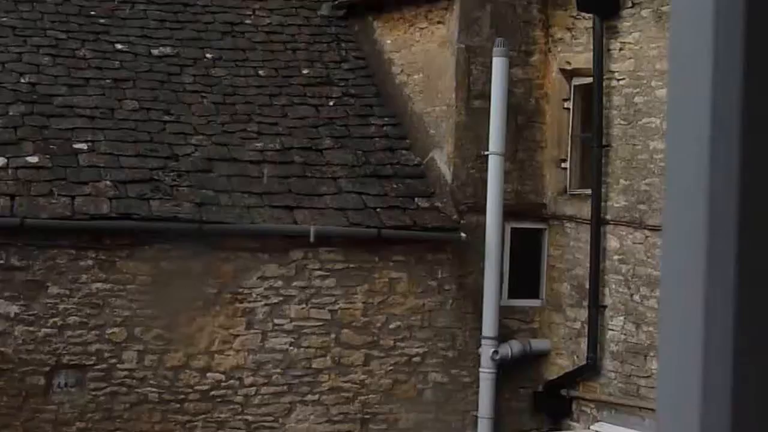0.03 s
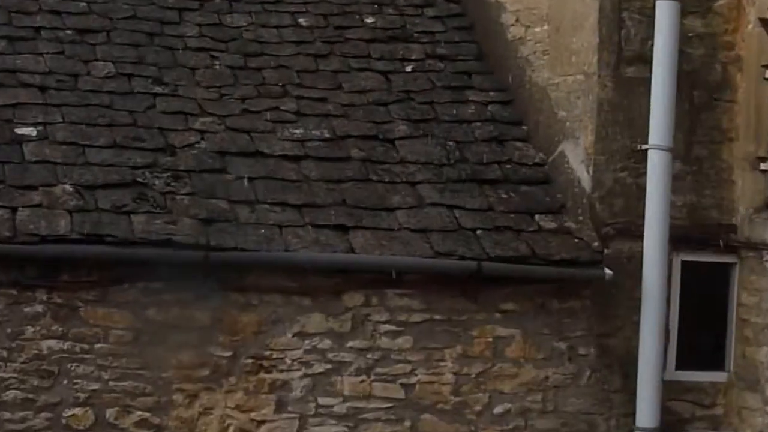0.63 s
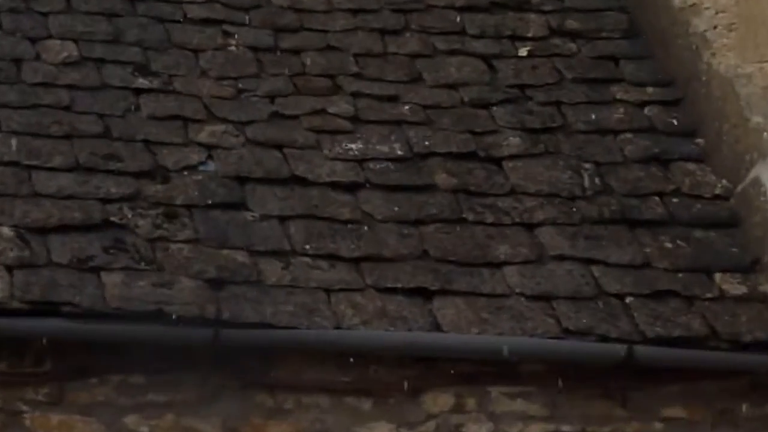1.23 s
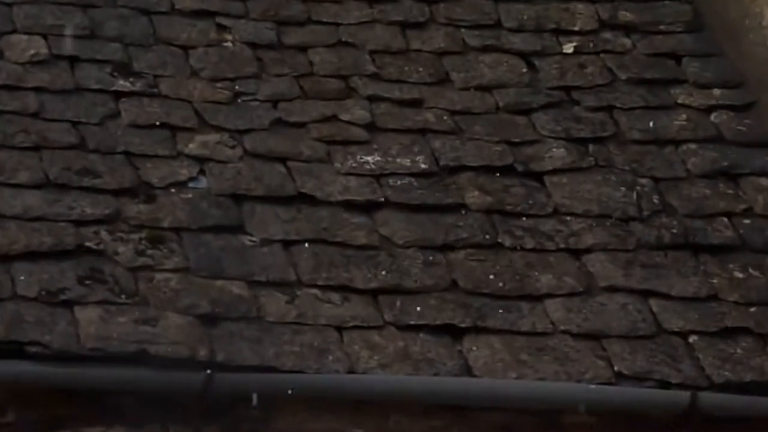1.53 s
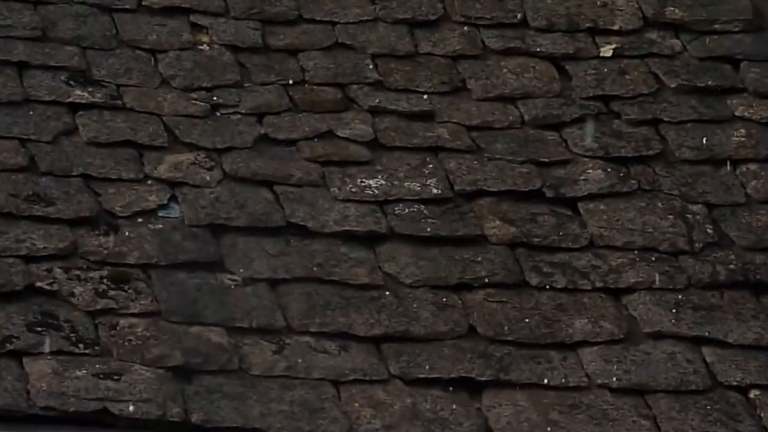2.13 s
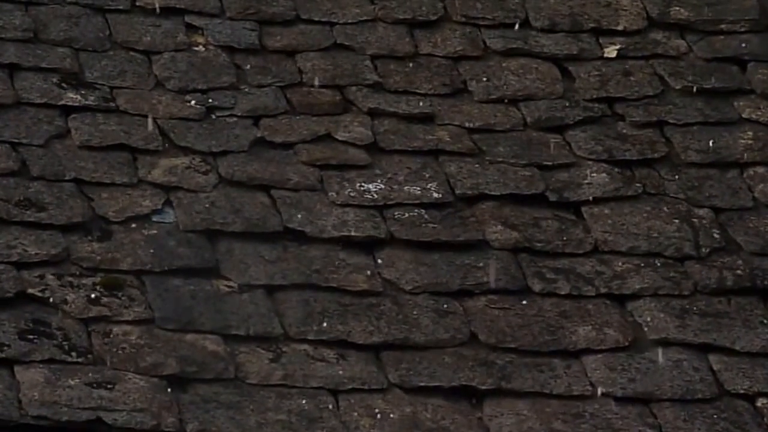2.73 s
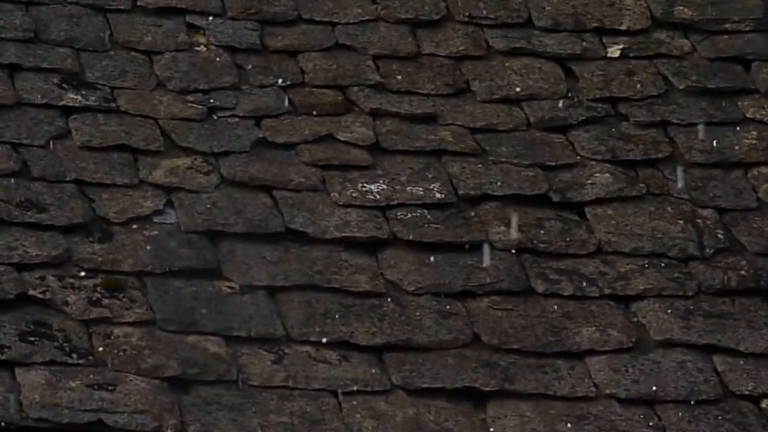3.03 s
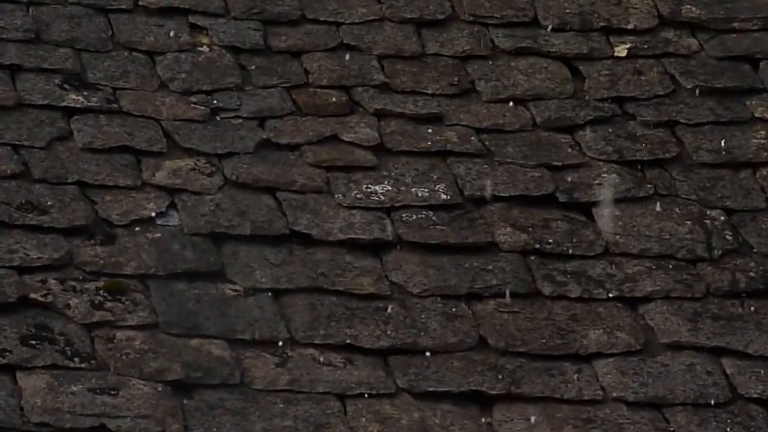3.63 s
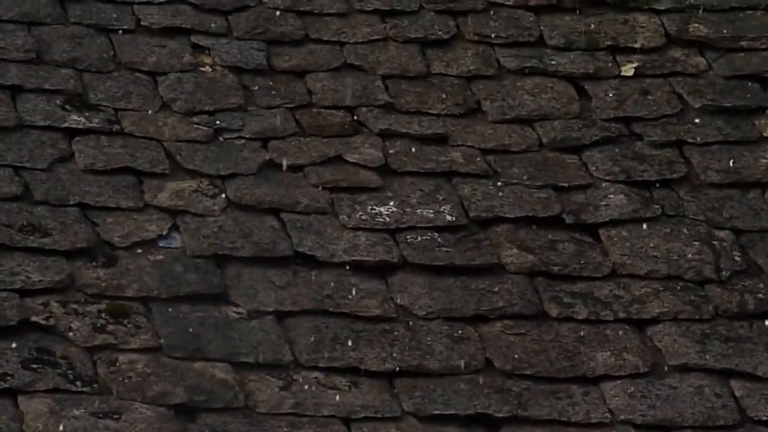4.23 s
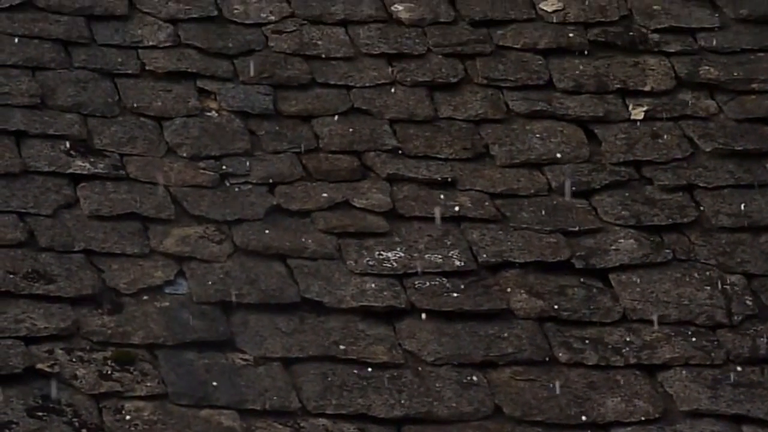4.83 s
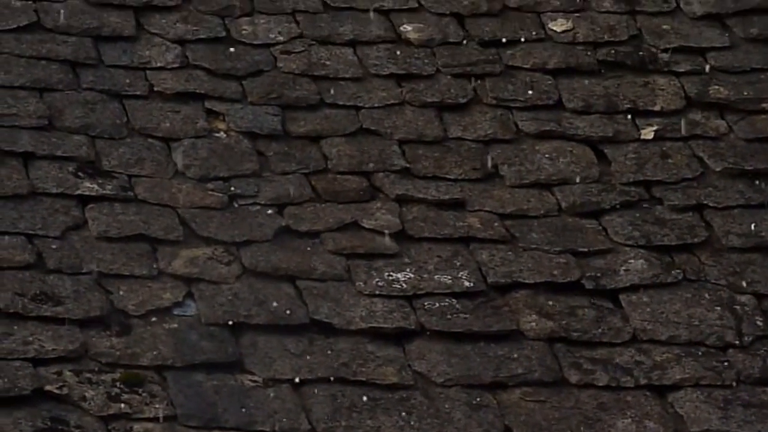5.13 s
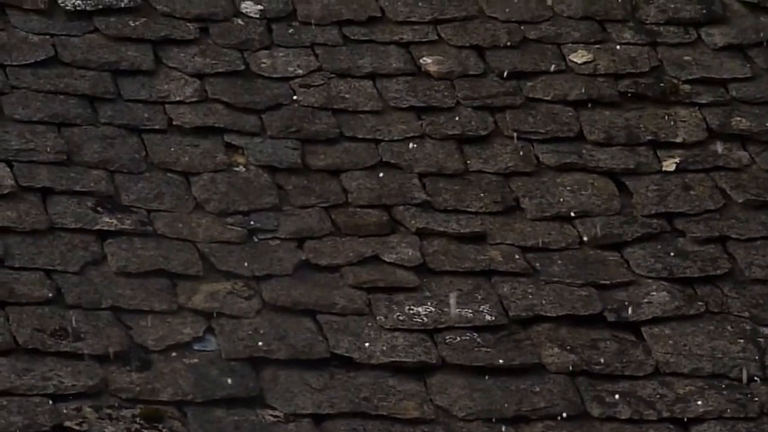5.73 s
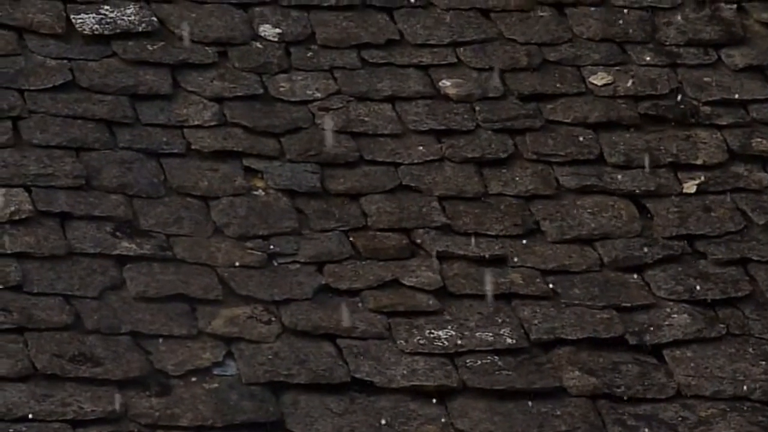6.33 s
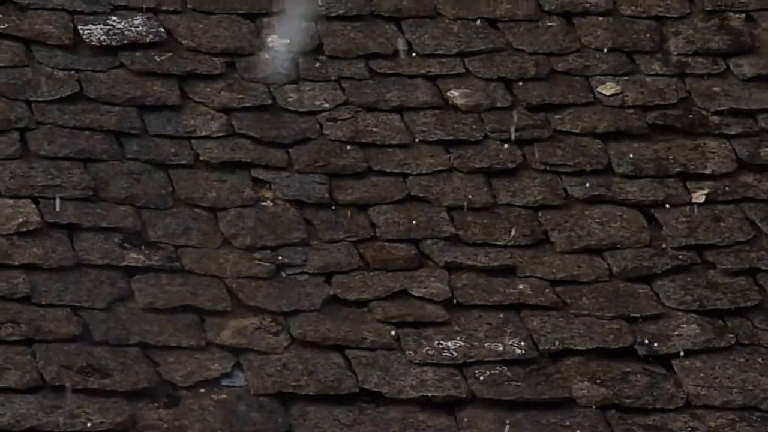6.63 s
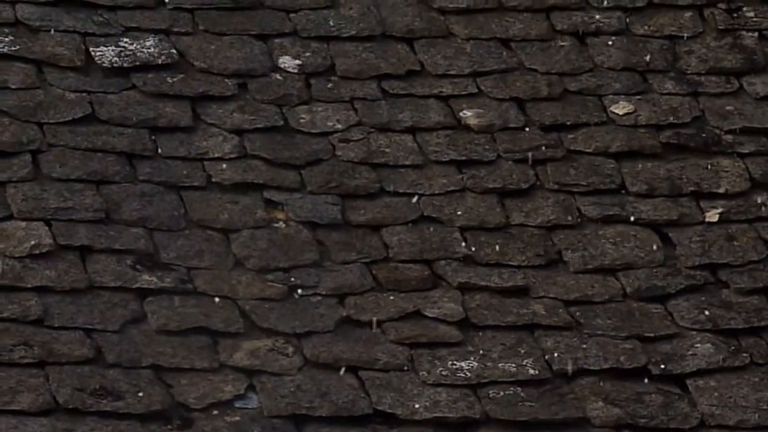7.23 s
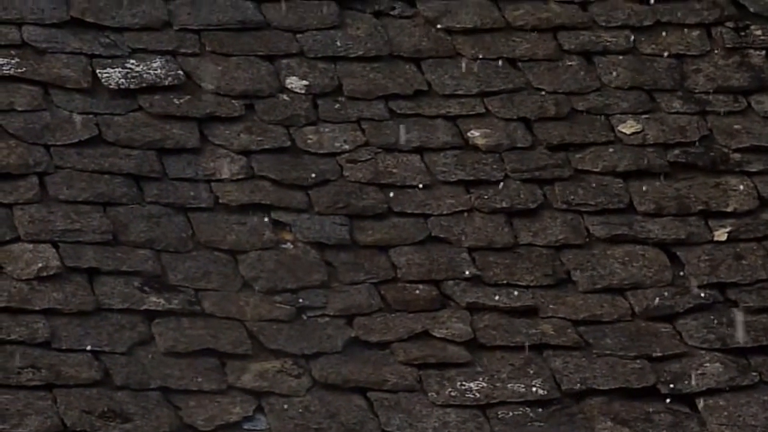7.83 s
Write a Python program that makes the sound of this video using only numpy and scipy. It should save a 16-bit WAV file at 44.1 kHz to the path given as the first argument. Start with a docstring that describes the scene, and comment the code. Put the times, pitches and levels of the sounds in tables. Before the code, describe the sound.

Hail falls on stone-tiled roofs and hard ground in a walled yard. It starts as a lighter patter with scattered sharp clicks, then grows heavier after about two seconds and stays dense. Close pellets hit with icy ticks, stony clacks and dull knocks, some bouncing once. Farther impacts merge into a grainy wash over a faint low rumble of outdoor air.

```python
"""Hail falls on stone-tiled roofs and hard ground in a walled yard, growing heavier after two seconds.
Each pellet gives a dull knock, a stony clack and an icy tick; near ones click sharply and some bounce,
far ones merge into a wash over a low rumble of outdoor air. The walls return a short tail.
The camera's microphone pair has four deep notches and a narrow band that rings thinly at its edge."""
import sys
import numpy as np
from scipy import signal
from scipy.fft import rfft, irfft
from scipy.io import wavfile

SR = 44100
rng = np.random.default_rng(int(sys.argv[2]) if len(sys.argv) > 2 else 0)


def bounce(signal):
    """Save signal as a 16-bit WAV file at the path given by the first command-line argument."""
    frames = np.transpose(np.atleast_2d(signal))
    limited = np.clip(frames, -1, 1)
    pcm = np.round(limited * 32767).astype(np.int16)
    wavfile.write(sys.argv[1], SR, pcm)


N = 351477
TAPS = 4096  # samples in one impact or filter response
HZ = np.fft.rfftfreq(TAPS, 1 / SR)

# The loudest, nearest hits, levels before trim:
# t/s, knock/dB, tile pitch/Hz, clack/dB, tick/dB, base half-life/ms, left minus right/dB
PELLETS = [(0.1152, -34.5, 900, -32, -36.0, 3, -3), (0.2407, -47, 800, -59, -34.5, 1.9, -2),
           (0.3327, -53, 790, -43, -32.5, 2.0, -1), (0.3809, -41.5, 455, -38, -39, 2.7, -1),
           (0.4577, -45, 1320, -56, -36.5, 1.3, -4), (0.8277, -38, 1090, -53, -39, 4.6, 1),
           (0.8399, -36, 720, -34.5, -45, 2.4, -4), (0.941, -37.5, 520, -60, -65, 5.3, 2),
           (1.0117, -52, 720, -44.5, -43, 3.9, 1), (1.2013, -35, 400, -45, -54, 7.3, 0),
           (1.5681, -46, 440, -46, -35.5, 1.4, -1), (1.5881, -47, 540, -35, -48, 3.2, 2),
           (1.6111, -41, 1130, -44, -46.0, 4.0, -2), (1.6774, -51, 820, -50, -30, 1.6, -2),
           (1.7492, -46, 540, -48, -31, 3.6, -2), (1.8144, -41, 1100, -40.5, -38.5, 5.1, -1),
           (1.8543, -35, 1280, -47, -39, 2.1, -3), (1.9129, -52, 870, -48, -32, 1.9, -3),
           (1.9304, -37.5, 910, -38, -28, 3.3, -2), (1.9562, -35.5, 1070, -45, -40.5, 3.9, -3),
           (2.052, -58, 1070, -40, -35, 2.9, -4), (2.1913, -30, 1290, -48, -53, 1.1, -3),
           (2.3656, -36.0, 1190, -45, -37.5, 5.8, -3), (2.4761, -34.0, 940, -45, -40, 2.5, -1),
           (2.6213, -31, 560, -27.5, -37.5, 3, 2), (2.7259, -50, 1160, -38, -32.5, 2.0, 0),
           (2.7832, -38, 490, -40, -43, 4.4, -3), (2.8204, -34, 740, -48, -35, 1.3, -1),
           (2.9355, -22.5, 1130, -28, -34.5, 2.1, -1), (3.0017, -35, 1140, -39, -30.5, 3.4, -2),
           (3.0216, -30.0, 870, -28, -43, 1.1, 0), (3.1724, -42, 500, -30.5, -34, 2.3, 8),
           (3.2172, -35, 1420, -37, -36, 2.9, -5), (3.2406, -30.5, 930, -38, -38, 2.5, -1),
           (3.3506, -30.5, 980, -31.5, -31.5, 2.4, -1), (3.4001, -26.5, 570, -30, -25, 3.7, -2),
           (3.4247, -29, 1100, -44, -41, 13, -5), (3.4926, -29, 1110, -25.5, -20.0, 2, -4.5),
           (3.5749, -52, 750, -50.5, -28.5, 1.5, -2), (3.6362, -25.5, 1140, -34.5, -30, 7.6, -4),
           (3.6572, -26, 1110, -35, -37, 1.7, -3), (3.6662, -33.5, 544, -43.5, -29, 1.4, -2),
           (3.6856, -29, 1000, -32.5, -49, 7.7, 3), (3.7066, -42, 930, -43, -28, 2.3, -3),
           (3.7892, -31.5, 1180, -35, -26, 1.8, -5), (3.8061, -29.5, 1113, -40.5, -51.5, 3.8, 2),
           (3.829, -36, 560, -45, -35, 1.3, 0), (3.9022, -31.5, 760, -47, -31.5, 12, -3),
           (3.9944, -30.5, 1080, -24, -37, 2.1, 2), (4.0179, -34, 1250, -34, -35, 3.4, 0),
           (4.0734, -25.5, 1080, -27.5, -29, 2.4, -1), (4.1032, -42, 1080, -32.5, -38, 1.5, -3),
           (4.1458, -24.5, 1020, -24.5, -24, 2.7, 1), (4.2447, -33.5, 1150, -39.5, -34.5, 2.6, -3),
           (4.2763, -28.5, 770, -38, -40, 7.0, -2), (4.3481, -31, 1060, -24.5, -22.5, 2.2, -1),
           (4.4136, -27, 524, -34.0, -35, 3.4, -3), (4.4383, -29.5, 1130, -36, -36, 6.1, -2),
           (4.4506, -30.5, 860, -42, -30, 1.7, -1), (4.4791, -31.5, 1110, -26.5, -27, 2.9, -1),
           (4.4945, -35, 1090, -30.0, -23.5, 1.6, 0), (4.6326, -26.5, 1090, -39, -35.5, 2.5, -1),
           (4.7979, -29, 1130, -27.5, -17.5, 1.4, -6.5), (4.8433, -37, 660, -41, -37, 2, 2),
           (4.8932, -28.5, 1100, -33.0, -31, 3.5, 2), (4.9857, -32.5, 895, -45, -43, 9.4, -4),
           (5.04, -30.5, 1340, -52, -54, 5, -4), (5.06, -32.5, 1120, -42, -32.5, 3, 2),
           (5.1588, -29, 1440, -29, -26, 4.3, -4), (5.2084, -31.5, 880, -32.5, -25, 1.6, 0),
           (5.2321, -40.5, 570, -40, -32.5, 2.7, -3), (5.286, -31.5, 1110, -30, -37, 1.5, -1),
           (5.2963, -31, 1120, -29, -32, 3.6, 3), (5.3178, -33, 1100, -41.0, -35.5, 2, -2),
           (5.3393, -30.5, 1230, -36.5, -39, 5.3, -1), (5.5207, -30.5, 1100, -35.0, -48, 4.1, -2),
           (5.5435, -40, 480, -37, -46, 7.9, 2), (5.6162, -27, 1080, -33.5, -41, 3.2, 0),
           (5.6549, -26.5, 900, -34, -44.5, 3.8, -4), (5.7141, -32, 733, -42.0, -41.5, 9.5, -5),
           (5.7679, -41, 1130, -36.5, -36, 1.8, 0), (5.8322, -39.5, 595, -34, -38, 3.8, 1),
           (6.0272, -43, 1120, -42, -26.5, 1.8, -1), (6.0388, -31, 1090, -30.0, -35, 3.5, 1),
           (6.0562, -43, 1200, -36, -22.5, 2.1, -3), (6.112, -25.5, 1140, -42, -50, 3.5, 4),
           (6.1616, -29.5, 1220, -29.5, -30.5, 3.5, -1), (6.2128, -30.5, 1080, -35, -33.5, 5.2, 2),
           (6.2286, -31, 1240, -30.5, -35, 3.3, 0), (6.5217, -33, 1230, -36.5, -35.5, 8.9, 1),
           (6.5907, -46, 990, -46, -30.5, 1.7, -7), (6.6244, -32, 1050, -31.5, -33, 13, 0),
           (6.6492, -44, 1040, -40, -30, 1.3, -2), (6.7117, -27, 1090, -32.0, -29, 5.6, -4),
           (6.7654, -32, 900, -34, -27.5, 3, -3), (6.7794, -26.5, 860, -32.5, -29, 1.2, -2),
           (6.811, -26.5, 870, -42, -31.0, 1.6, -4), (6.9001, -27, 1090, -50, -45, 6.5, -1),
           (6.917, -31.5, 710, -31.5, -27.5, 2.7, -4), (7.031, -29, 1360, -37, -33, 7.2, -6),
           (7.1885, -27.5, 945, -22.5, -17.5, 1.6, -2), (7.3483, -36, 920, -28, -27.0, 3.3, 1),
           (7.3747, -25, 1110, -28.5, -26.5, 2.9, -2), (7.4547, -25, 1200, -25.5, -26.5, 2.9, 1),
           (7.492, -41, 680, -38, -30, 2.1, -2), (7.5467, -30.5, 1190, -44, -42, 3.5, -1),
           (7.6004, -33, 970, -27.0, -50, 1.7, -1), (7.6227, -24.5, 1090, -30.5, -26.5, 5.7, -3),
           (7.6446, -38, 1110, -44.5, -32.5, 2.4, -3), (7.8612, -26.5, 930, -24.5, -33, 2.5, 4),
           (7.9548, -42, 1110, -29.5, -30.5, 1.3, -2)]


def gain_of(db):
    """Decibels to amplitude."""
    return 10 ** (np.asarray(db) / 20)


def unit_rms(x):
    """Scales to rms 1."""
    return x / np.sqrt(np.mean(x ** 2) + 1e-20)


def curve_at(points, hz):
    """Reads a table on a log-frequency axis."""
    f, value = np.transpose(points)
    return np.interp(np.log(hz + 1), np.log(f + 1), value)


def colour(points):
    """The minimum-phase response of an EQ curve."""
    log_gain = np.log(gain_of(curve_at(points, HZ)))
    mirrored = np.r_[log_gain, log_gain[-2:0:-1]]
    return np.exp(np.conj(signal.hilbert(mirrored)))[:len(HZ)]


def mic_pair(spectra, hz):
    """Turns two unrelated spectra into left and right, alike in the bass and wider above."""
    # Stereo width of the two microphones: f/Hz, side minus mid/dB
    width_curve = [(30, -31.5), (90, -47), (250, -43), (500, -28.5), (1100, -19.5), (1700, -8),
                   (2500, -4.5), (3400, -4.5), (4200, -4), (5600, -6.5), (8000, -4)]
    width = gain_of(curve_at(width_curve, hz))
    mid, side = spectra[0], width * spectra[1]
    return np.array([mid + side, mid - side]) / np.sqrt(1 + width ** 2)


def panned(pan_db):
    """Constant-power pan gains; positive leans left."""
    return unit_rms(gain_of([[pan_db / 2], [-pan_db / 2]]))


def shower(s):
    """Low and high band levels at times s: the hail swells, the highs less than the lows."""
    # Strength of the shower: t/s, level/dB
    strength = [(0.3, -47.5), (1.13, -45), (1.55, -47.5), (2.22, -43.5), (2.32, -41.5), (2.79, -38.5),
                (3.37, -37.5), (3.49, -38.5), (3.67, -41.5), (4.01, -36.5), (5.11, -39), (6.16, -37),
                (6.35, -37.5), (6.56, -40), (6.86, -36.5), (7.37, -37), (7.54, -34.5), (7.95, -35.5)]
    low_db = np.interp(s, *np.transpose(strength))
    full_low_db, full_high_db, high_follows = -35.5, -41.5, 0.77
    return low_db, full_high_db + high_follows * (low_db - full_low_db)


def wash(spectrum, level_db, per_s, ring_s):
    """A grainy bed: noise whose power jumps at random moments and dies away."""
    strikes = rng.exponential(1, N) * (rng.random(N) < per_s / SR)
    power = signal.lfilter([1], [1, -np.exp(-1 / (ring_s * SR))], strikes)
    grains = np.sqrt(power) * rng.standard_normal((2, N))
    stereo = irfft(mic_pair(rfft(grains), np.fft.rfftfreq(N, 1 / SR)), N)
    bed = signal.oaconvolve(stereo, irfft(colour(spectrum))[None], axes=1)[:, :N]
    return gain_of(level_db) * unit_rms(bed)


def far_hail():
    """Countless distant impacts merge into a dull body and a bright fizz."""
    # Body of the far hail: f/Hz, level/dB
    body_eq = [(20, -35), (45, -19), (80, -8), (130, 0.5), (190, -7.5), (250, -3.5), (320, -4), (500, 3),
               (800, -0.5), (1150, 1.5), (1600, -4), (2300, -5), (3200, -8.5), (6000, -53)]
    # Fizz of the far hail: f/Hz, level/dB
    fizz_eq = [(1200, -21.5), (2400, -5.5), (3400, 3), (4400, 1), (6000, 3), (7000, -1), (7800, -3.5),
               (9000, -30)]
    low_db, high_db = shower(np.arange(N) / SR)
    body = wash(body_eq, low_db - 1.92, per_s=700, ring_s=0.0063)
    fizz = wash(fizz_eq, high_db - 0.5, per_s=2100, ring_s=0.0018)
    return body + fizz * panned(-1.2)


def air_rumble():
    """Outdoor air rumbles steadily under the hail."""
    # Low end of the open air: f/Hz, level/dB
    rumble_eq = [(20, -15), (45, -1.5), (90, 4.5), (130, 7), (260, -3.5), (700, -26)]
    return wash(rumble_eq, level_db=-57.5, per_s=1800, ring_s=.05)


def tile(hz, width_hz, ring_db):
    """One damped mode of a stone tile, standing out of a flat response."""
    return 1 + gain_of(ring_db) / (1 + 2j * (HZ - hz) / width_hz)


def burst(response, half_ms, scatter_db, scatter_ms, direct_db):
    """One voice of an impact: direct snap, crack, and scatter from the tiles around."""
    ms = np.arange(TAPS) * 1000 / SR
    snap = gain_of(direct_db) ** 2 * np.exp(-half_ms) * (ms < 1)  # only near, short impacts keep it
    crack = 2 ** (-ms / half_ms) / half_ms
    scatter = gain_of(scatter_db) ** 2 * 2 ** (-ms / scatter_ms) / scatter_ms
    noise = np.sqrt(snap + crack + scatter) * rng.standard_normal((2, TAPS))
    voice = irfft(mic_pair(rfft(noise), HZ) * response)
    return unit_rms(voice) * np.sqrt(SR / 100 / TAPS)  # the energy of 10 ms at rms 1


def impacts(rows, knock_trim_db, clack_trim_db, tick_trim_db):
    """Pellets strike stone: the tick dies first, the knock lasts longest. Rows are as in PELLETS."""
    # Dull knock of the tile: f/Hz, level/dB
    knock_eq = [(40, -33.5), (120, -3), (250, -0.5), (350, -5), (500, -0.5), (800, -1), (1150, 0),
                (1600, -3.5), (2300, -4), (3000, -33.5), (5000, -49.5)]
    # Stony clack: f/Hz, level/dB
    clack_eq = [(1500, -23), (2400, -6.5), (3000, -2), (3600, 1), (4300, -3), (5000, -10), (7000, -51.5)]
    # Icy tick: f/Hz, level/dB
    tick_eq = [(3000, -49), (4400, -8), (5100, 2), (6000, 5), (7000, 1.5), (7700, -2), (9000, -17)]
    knock_tone, clack_tone, tick_tone = colour(knock_eq), colour(clack_eq), colour(tick_eq)
    out = np.zeros((2, N))
    for s, knock_db, hz, clack_db, tick_db, half_ms, pan_db in rows:
        low_mode = knock_tone * tile(hz, width_hz=170, ring_db=3.5)
        knock = burst(low_mode, 1.2 + 0.71 * half_ms, scatter_db=-14.5, scatter_ms=18, direct_db=7.0)
        high_mode = clack_tone * tile(rng.uniform(2540, 4000), width_hz=360, ring_db=3)
        clack = burst(high_mode, 0.75 * half_ms, scatter_db=-18.0, scatter_ms=6.4, direct_db=6.5)
        tick = burst(tick_tone, 0.53 * half_ms, scatter_db=-20.0, scatter_ms=3.7, direct_db=6)
        bright = gain_of(clack_db + clack_trim_db) * clack + gain_of(tick_db + tick_trim_db) * tick
        hit = gain_of(knock_db + knock_trim_db) * knock + bright * panned(pan_db)
        slot = out[:, round(s * SR):][:, :TAPS]
        slot += hit[:, :slot.shape[1]]
    return out


def patter(count=560, spread_db=3.0, tilt_db=5.0, colour_db=6.8, lean_db=-2.0, width_db=3):
    """Small pellets farther off land at random, as strongly as the shower falls."""
    when, size, hardness, brightness, slab, length, side = rng.random((count, 7)).T
    s = when * N / SR
    low_db, high_db = shower(s)
    size_db = spread_db * np.minimum(-np.log(1 - size), 2.2)
    hard_db = tilt_db * (2 * hardness - 1)  # hard ice ticks, slush knocks
    bright_db = colour_db * (2 * brightness - 1)
    knock_db, top_db = low_db + size_db - hard_db, high_db + size_db + .5 * hard_db
    tile_hz, half_ms = 420 * 5 ** slab, 1.0 + 3 * length
    pan_db = lean_db + width_db * (2 * side - 1)
    rows = np.transpose([s, knock_db, tile_hz, top_db - bright_db, top_db + bright_db, half_ms, pan_db])
    return impacts(rows, knock_trim_db=-7.5, clack_trim_db=-4.0, tick_trim_db=-5.5)


def roof_taps(count=75, spread_db=3.5, tilt_db=8.0, colour_db=4.5, lean_db=1.0, width_db=7.0):
    """Middling pellets keep hitting the roof: hard ice gives a short tick, soft ice a longer knock."""
    when, size, hardness, brightness, slab, side = rng.uniform(-1, 1, (count, 6)).T
    s = (np.arange(count) + .5 + .5 * when) / count * N / SR  # one tap in each equal time slot
    low_db, high_db = shower(s)
    size_db, hard_db, bright_db = spread_db * size, tilt_db * hardness, colour_db * brightness
    knock_db, top_db = low_db + size_db - hard_db, high_db + size_db + .5 * hard_db
    tile_hz, half_ms = 1000 * 2 ** (0.36 * slab), 3.5 * 2 ** -hardness
    pan_db = lean_db + width_db * side
    rows = np.transpose([s, knock_db, tile_hz, top_db - bright_db, top_db + bright_db, half_ms, pan_db])
    return impacts(rows, knock_trim_db=1.0, clack_trim_db=-1.5, tick_trim_db=5.0)


def near_pellets():
    """Large pellets click sharply on stone close to the microphones."""
    return impacts(PELLETS, knock_trim_db=0.63, clack_trim_db=3.0, tick_trim_db=3.5)


def bounces(share=.45, soonest_s=.011, latest_s=.06, trim_db=-10.5):
    """Some large pellets hop and land again on the same tile, the same sound but weaker."""
    chance, flight = rng.random((len(PELLETS), 2)).T
    s, *same_voice = np.transpose(PELLETS)
    landing_s = s + soonest_s + (latest_s - soonest_s) * flight ** 2
    rows = np.transpose([landing_s, *same_voice])[chance < share]
    return impacts(rows, knock_trim_db=trim_db, clack_trim_db=trim_db, tick_trim_db=trim_db)


def yard_tail(x, build_s=0.014):
    """Dense echoes build up between the stone walls; the treble dies first."""
    # Reverb time of the yard: f/Hz, t60/s
    decay_times = [(150, 0.46), (1000, 0.17), (3500, 0.055), (8000, 0.085)]
    hz, t, noise = signal.stft(rng.standard_normal((2, SR // 2)), SR, nperseg=256)
    decay = gain_of(-60 * t / curve_at(decay_times, hz)[:, None])
    onset = 1 - np.exp(-t / build_s)
    tail = signal.istft(mic_pair(noise, hz[:, None]) * decay * onset, SR, nperseg=256)[1]
    return signal.fftconvolve(x.mean(0)[None], tail / np.linalg.norm(tail[0]), axes=1)[:, :N]


def ring(x, hz, width_hz):
    """A narrow resonance with a peak gain of 1."""
    return signal.lfilter(*signal.iirpeak(hz, hz / width_hz, SR), x)


def low_pass(x, edge_hz, taps):
    """A steep high cut."""
    kernel = signal.firwin(taps, edge_hz, window=("kaiser", 7), fs=SR)
    return signal.oaconvolve(x, kernel[None], "same")


def scene():
    """Single hits and their wall echoes, over the far wash and the rumble."""
    hail = near_pellets() + bounces() + roof_taps() + patter()
    return hail + gain_of(-17) * yard_tail(hail) + far_hail() + air_rumble()


def record(dry):
    """Yard resonances, then the camera: notches, a narrow band with a ringing edge, a hard ceiling."""
    # Narrow resonances of the yard: f/Hz, width/Hz, boost/dB
    resonances = [(242, 17, 4.5), (353, 16, 5), (746, 29, 1.5), (1122, 26, 2)]
    # Notches of the microphones: f/Hz, width/Hz
    notches = [(2595, 556), (4597, 606), (5426, 450), (7913, 420)]
    start_s, whine_hz = .07, 7996
    x = dry * (np.arange(N) > start_s * SR)  # the sound cuts in after a brief silence
    for hz, width_hz, boost_db in resonances:
        x = x + (gain_of(boost_db) - 1) * ring(x, hz, width_hz)
    whine = gain_of(-2.5) * ring(ring(x, whine_hz, width_hz=68), whine_hz, width_hz=68)
    for hz, width_hz in notches:
        x = x - .97 * ring(x, hz, width_hz)
    x = low_pass(x, edge_hz=8050, taps=141) + whine
    return low_pass(np.clip(x, -1, 1), edge_hz=15800, taps=255)


dry = scene()
out = record(dry)
bounce(out)
```